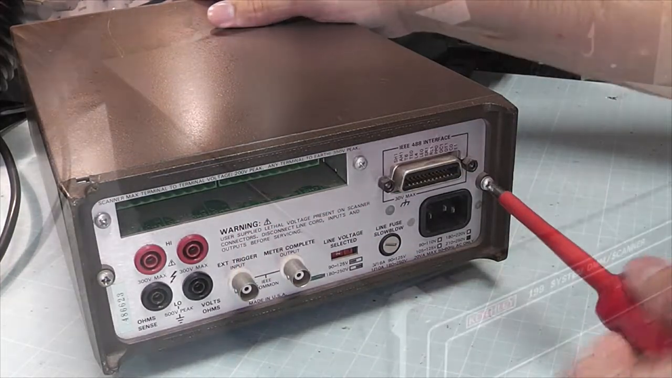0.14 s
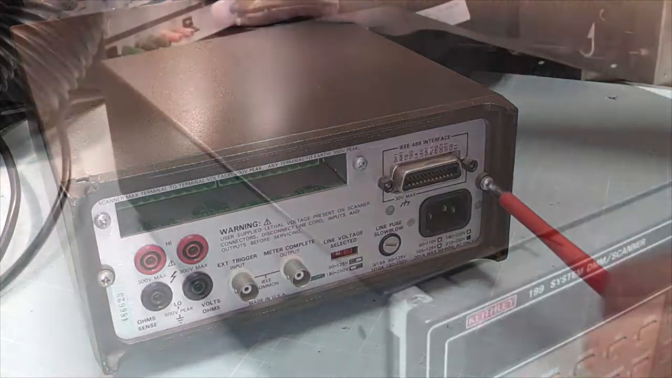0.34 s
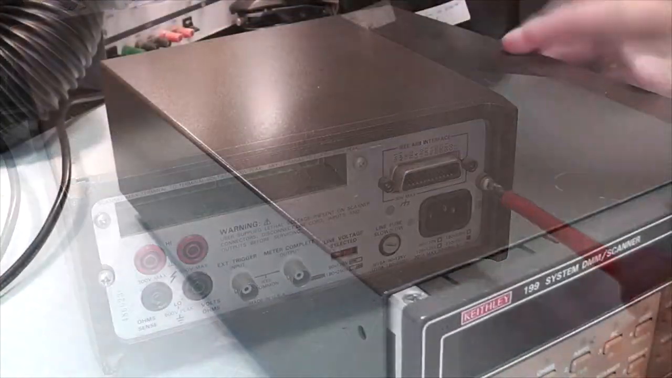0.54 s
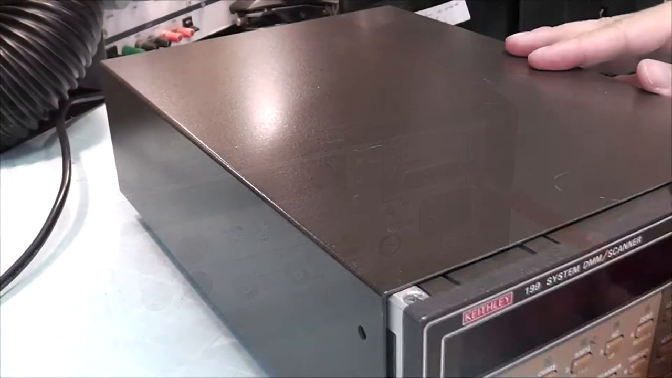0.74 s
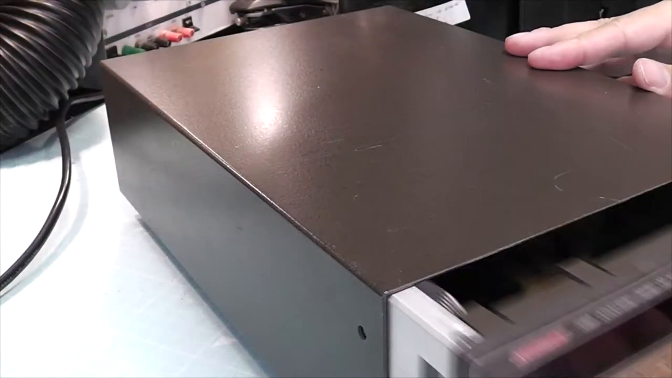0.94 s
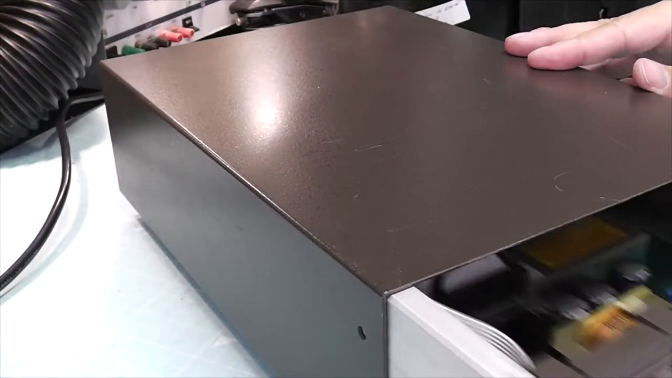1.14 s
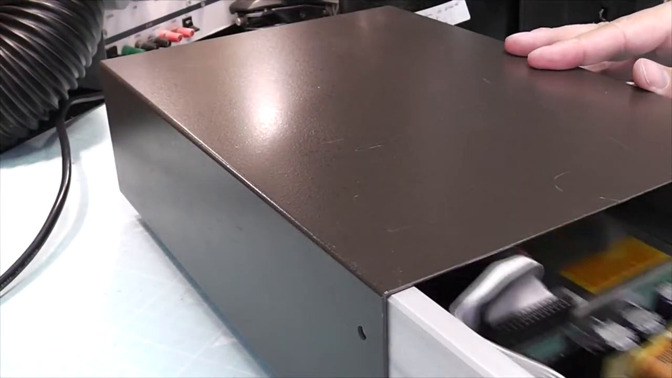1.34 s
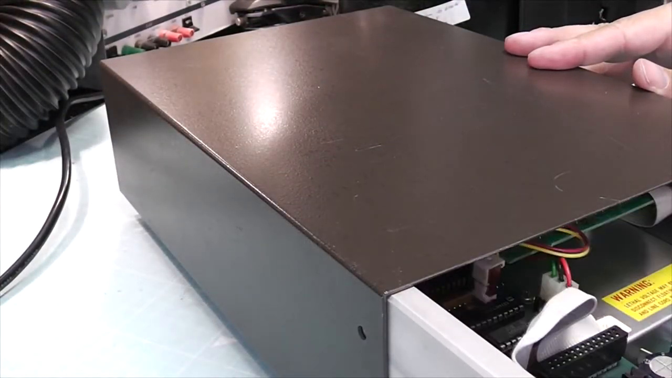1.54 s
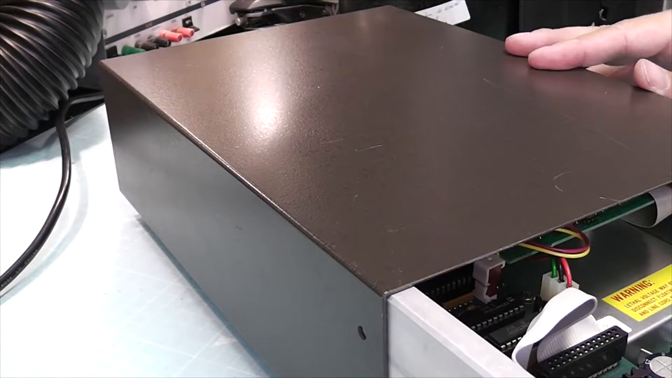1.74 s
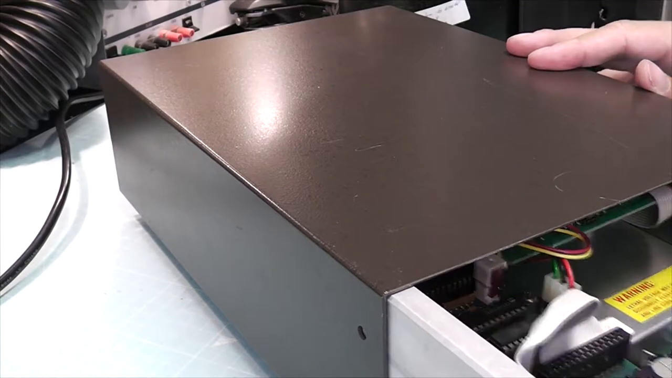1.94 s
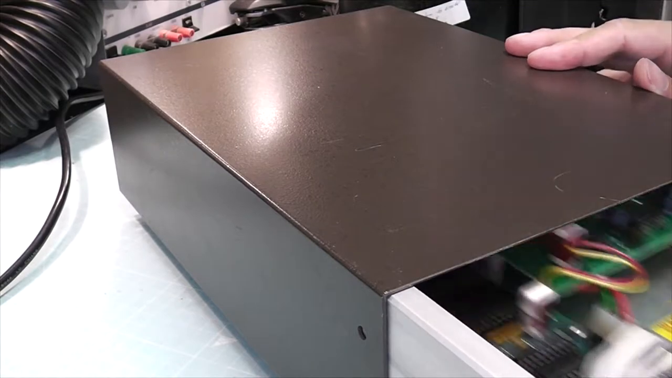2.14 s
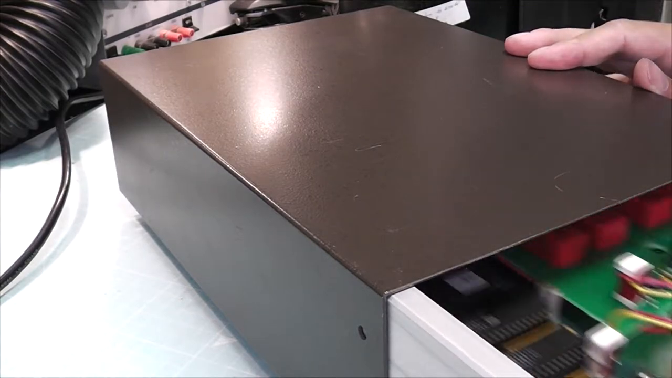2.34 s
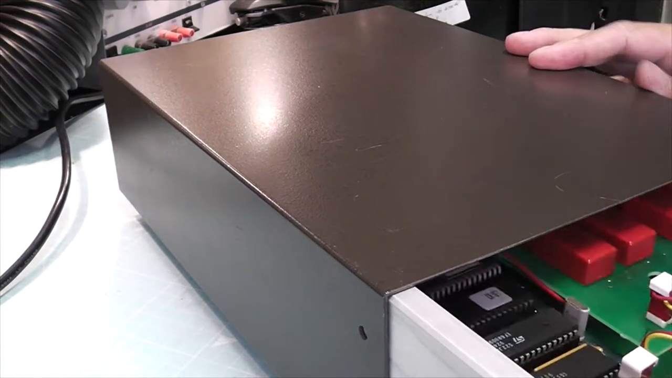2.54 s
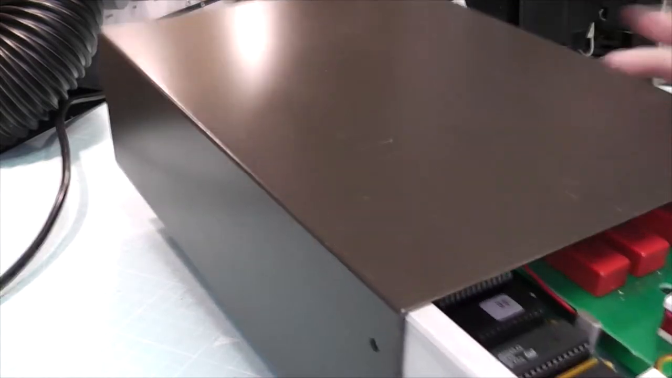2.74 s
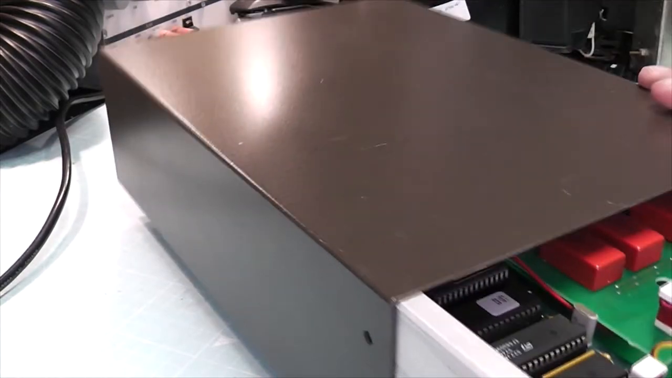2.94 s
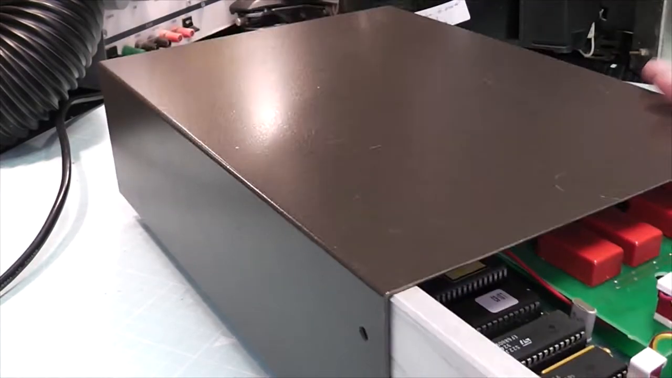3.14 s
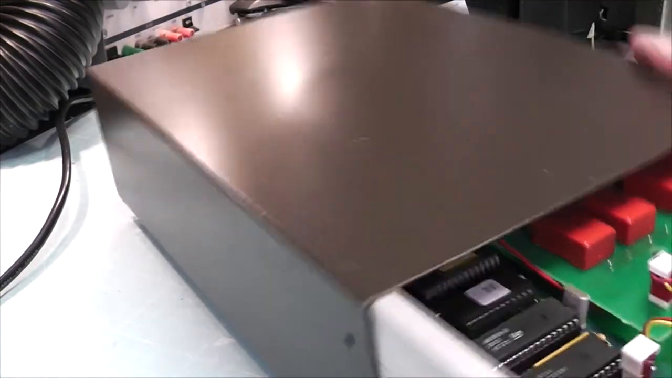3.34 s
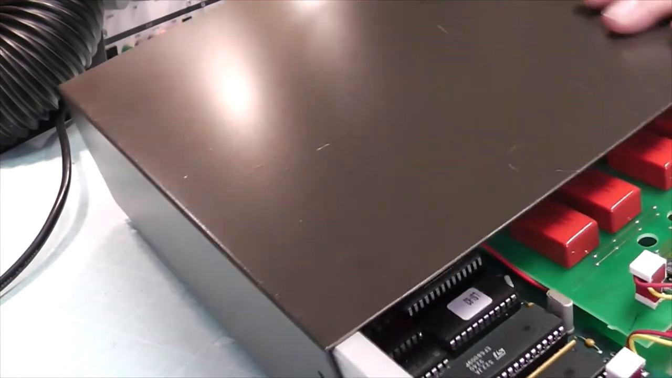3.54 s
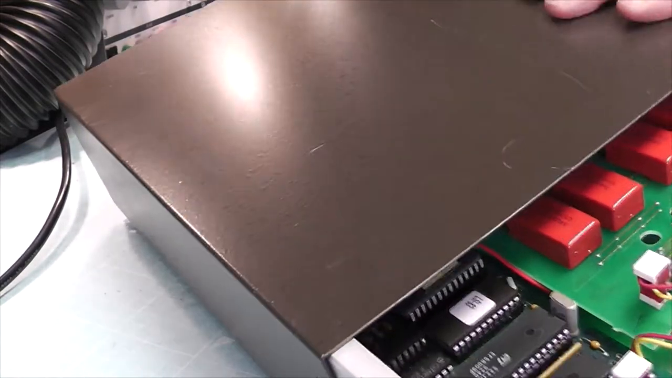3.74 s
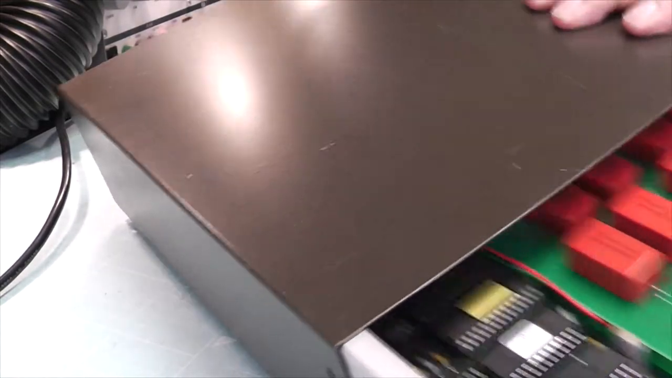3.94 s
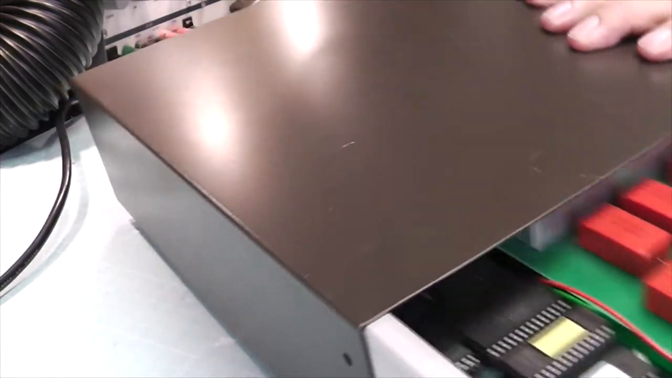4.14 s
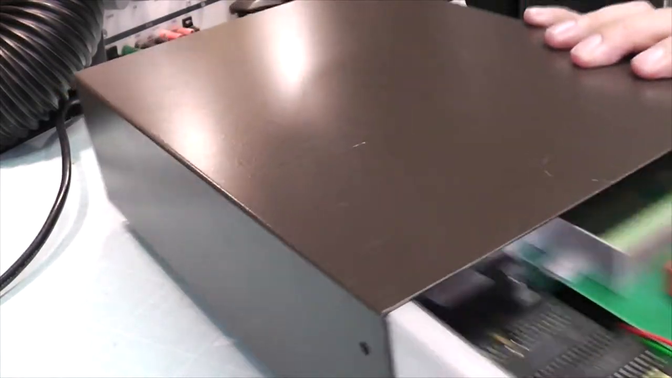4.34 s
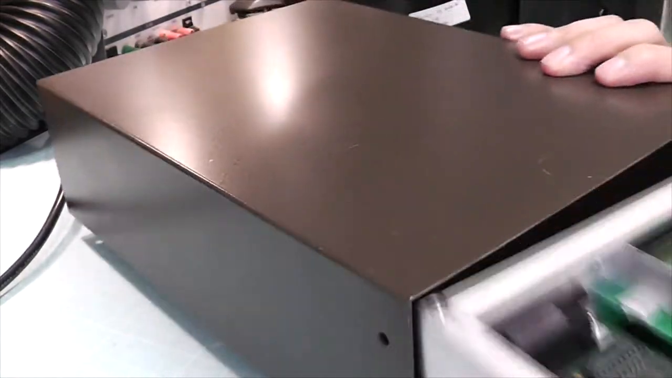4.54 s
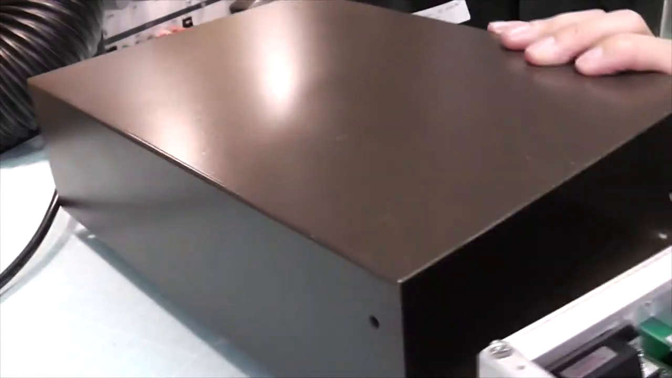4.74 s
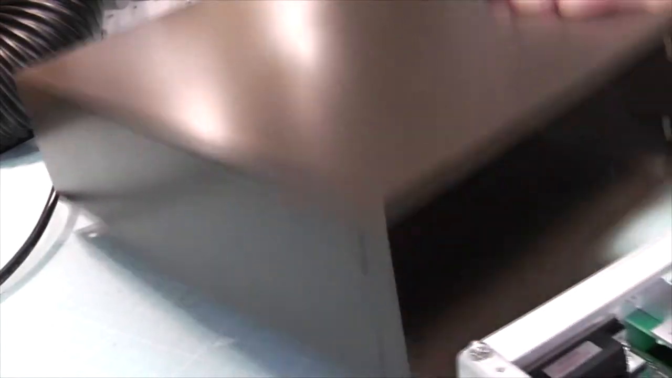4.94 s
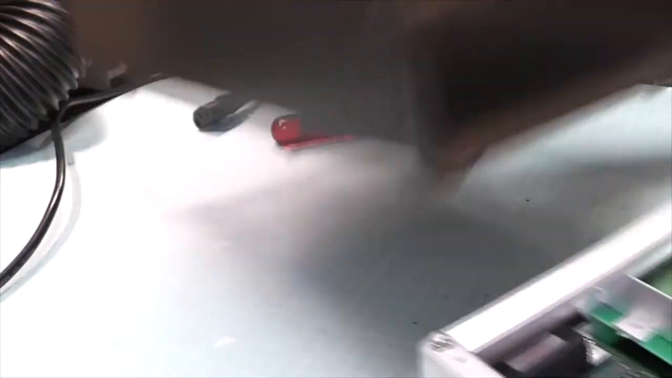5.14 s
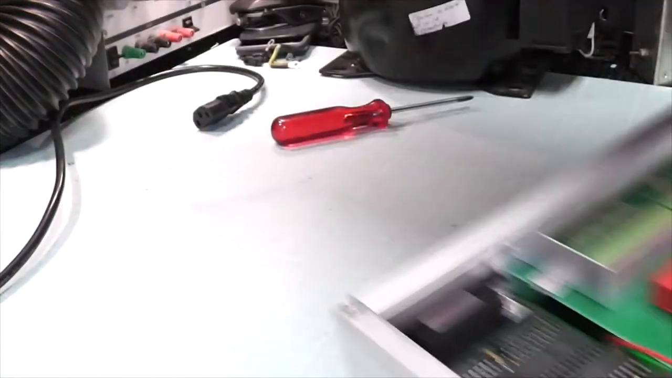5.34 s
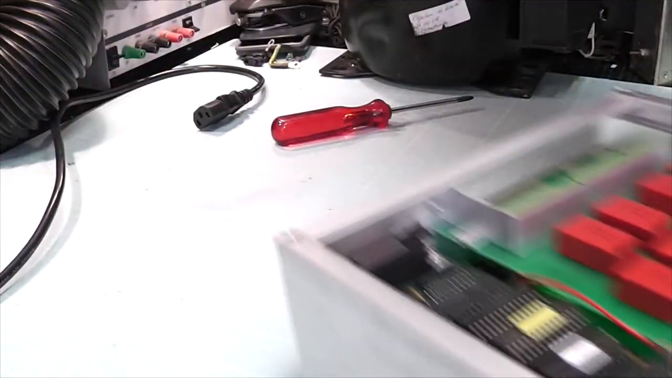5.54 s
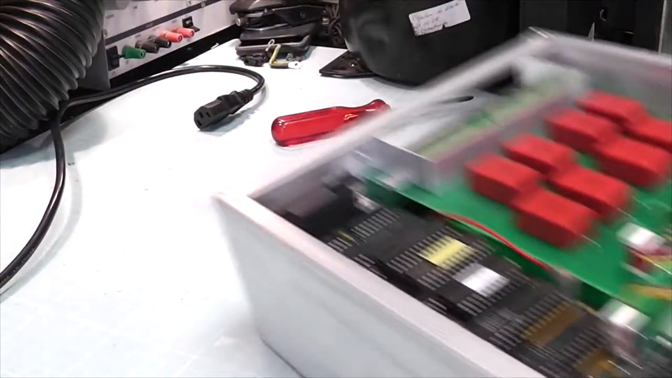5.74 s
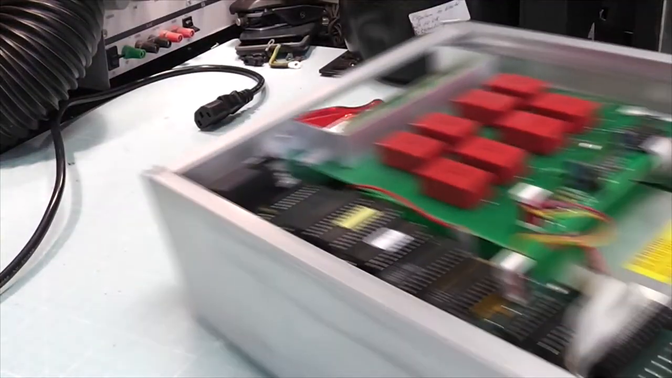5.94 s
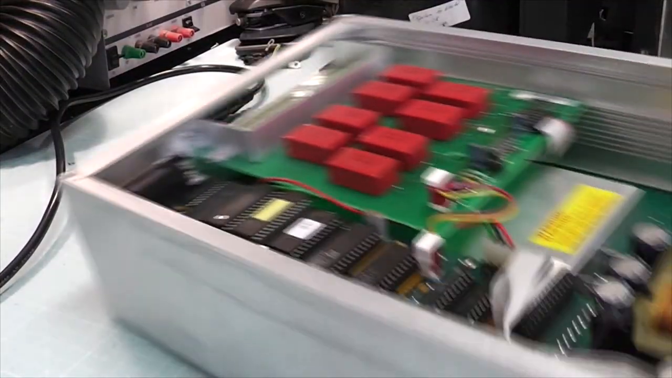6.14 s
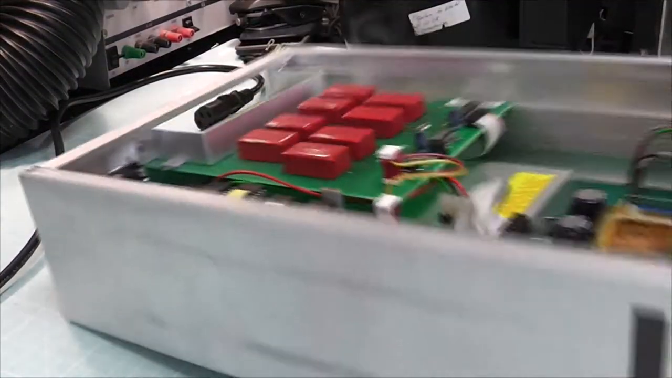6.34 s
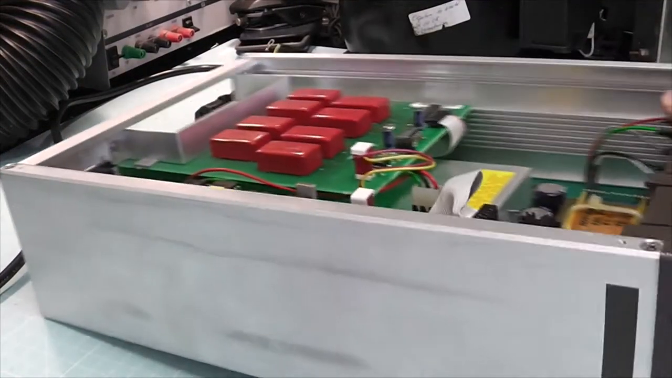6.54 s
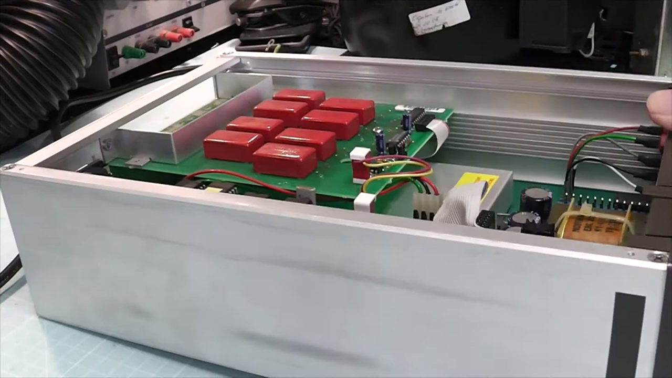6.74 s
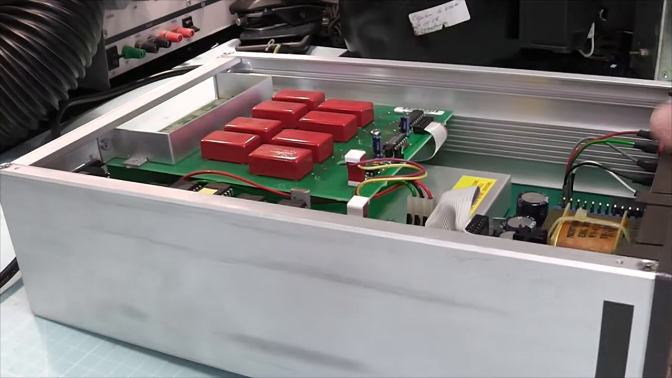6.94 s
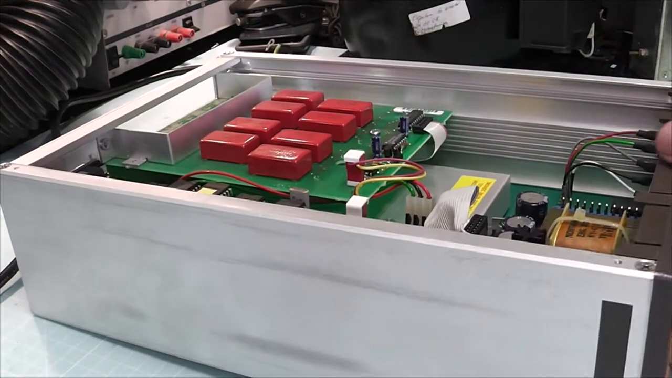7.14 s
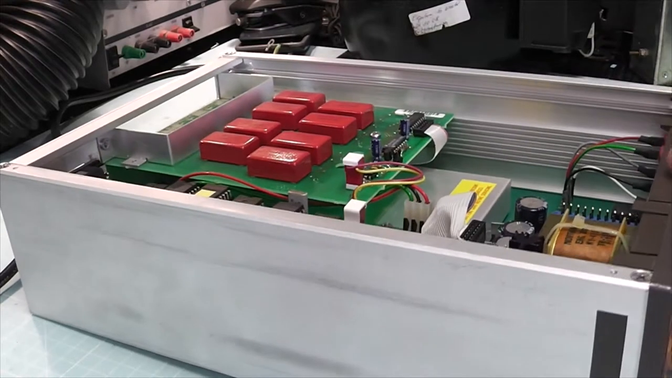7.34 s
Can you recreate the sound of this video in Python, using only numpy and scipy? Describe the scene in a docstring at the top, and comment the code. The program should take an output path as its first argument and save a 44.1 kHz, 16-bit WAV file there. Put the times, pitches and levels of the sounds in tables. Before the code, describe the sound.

After faint rubbing and light taps, a sheet-metal instrument case is worked off its chassis on a workbench. Metal scrapes on metal in uneven, hollow, hissy pulls, broken by sharp knocks, loud jerks and one brief squeak. The panels ring briefly as the case comes free. The chassis is then dragged softly and set down with a couple of clunks. The microphone is close, in a small quiet room.

```python
"""First come faint rubbing and light knocks: a sheet-metal case is being worked loose on a workbench.
Then it is pulled off its chassis (the inner frame) in jerks. Metal grinds on metal in tiny slips that
ring the panels, hiss and shake the bench. An edge squeaks; the chassis is dragged and dropped.
A small quiet room answers, and a nearby camera's limiter holds down the loudest jerks."""
import sys
import numpy as np
from scipy import signal
from scipy.fft import rfft, irfft
from scipy.io import wavfile
from scipy.ndimage import uniform_filter1d, minimum_filter1d

SR = 44100
rng = np.random.default_rng(int(sys.argv[2]) if len(sys.argv) > 2 else 0)


def master_out(mix):
    """Clip the mix to full scale and print it as 16-bit PCM to the path in sys.argv[1]."""
    frames = np.transpose(np.atleast_2d(mix))
    ceiling = np.clip(frames, -1, 1)
    pcm = np.round(ceiling * 32767).astype(np.int16)
    wavfile.write(sys.argv[1], SR, pcm)


N = 326340

# Hiss and thrum (the bench's low hum) offsets are added to the grinding level of the same row.
# faint rubbing of hands, screwdriver and chassis
# (time [s], grinding [dB], hiss offset [dB], thrum offset [dB])
HANDLING = [(0, -50.5, -2.5, -1.5), (0.301, -56.5, -2, 2.5), (0.42, -45, -5, 1), (0.789, -46, -24, 0.5),
            (1.68, -40.5, -20.5, -8), (1.88, -54, -20, -0.5), (2.56, -29.5, -21.5, -7.5),
            (2.72, -67.5, -11, 9), (3.251, -43.5, -39, -22), (3.8, -58, -6, -15), (4.88, -43, -20, -2),
            (5.08, -55.5, -16, 0), (5.2, -45.5, -9, -19), (5.4, -59, -8.5, 1.5), (5.6, -49.5, -14.5, -2.5),
            (6.2, -50, -18.5, -6), (6.3, -65.5, -6, 7), (6.75, -67.5, -12, 5), (7.4, -82, -17, -4)]
# edges knocking (time [s], grinding [dB], hiss offset [dB], time to fade 60 dB [s])
KNOCKS = [(0.055, -37, -8, 0.078), (0.242, -38, -8.5, 0.043), (0.405, -26.5, -13, 0.048),
          (0.464, -33, -24, 0.19), (0.577, -22.5, -16, 0.078), (0.646, -26, -42, 0.048),
          (0.711, -21, -27.5, 0.079), (0.74, -27.5, -62, 0.096), (0.855, -13.5, -15, 0.04),
          (0.867, -18, -30, 0.038), (0.893, -15, -44, 0.06), (1.001, -15.5, -41, 0.046),
          (1.612, -18.5, -18.5, 0.064), (1.826, -19.5, -24, 0.034), (1.921, -22.5, -46, 0.023),
          (1.967, -35, -27, 0.085), (2.519, -8, -22.5, 0.085), (2.533, -21.5, -36, 0.094),
          (3.199, -21.5, -24, 0.028), (3.918, -23, -28, 0.065), (4.02, -19.5, -23, 0.11),
          (4.667, -10, -9.5, 0.06), (6.203, -40.5, -33, 0.12), (6.439, -19.5, -10.5, 0.16),
          (6.457, -22, -19, 0.17), (6.607, -21.5, -25, 0.022), (6.769, -41, -40, 0.035),
          (6.912, -42, -18, 0.044), (7.118, -42.5, -45, 0.087)]
KNOCK_THRUM_OFFSET_DB = -22
# smooth pulls (time at full strength [s], hold [s], grinding [dB], hiss offset [dB], thrum offset [dB])
SLIDES = [(0.846, 0.23, -29, -14, -8), (1.02, 0.46, -28, -10, -23), (1.438, 0.099, -18.5, -21.5, -38.5),
          (2.026, 0.18, -26, -14, -37), (2.176, 0.088, -19, -15.5, -22.5), (2.28, 0.16, -25, -11.5, -41),
          (2.327, 0.027, -18, -34.5, -51), (2.56, 0.051, -36.5, -36, -20), (3.14, 0.093, -36, -28, -11),
          (3.362, 0.047, -26.5, -14, -37), (3.494, 0.0079, -22.5, -46, -16), (3.67, 0.094, -24, -19.5, -24),
          (3.84, 0.41, -38.5, -7, -20), (3.932, 0.047, -29.5, -14.5, -23), (4.04, 0.051, -31.5, -16, -17),
          (4.32, 0.09, -18.5, -17, -20.5), (4.48, 0.049, -32.5, -35.5, -38.5),
          (4.633, 0.055, -13, -18, -13.5), (4.749, 0.0042, -22.5, -16.5, -10),
          (4.838, 0.0038, -24.5, -15.5, -5), (7.295, 0.023, -46.5, -32, -11)]
SLIDE_RISE_DB_S, SLIDE_FALL_DB_S = 301, 271
# short bright scuffs of an edge (time [s], hiss [dB])
SCUFFS = [(1.204, -40.5), (2.622, -41), (2.737, -50), (2.804, -41), (3.157, -43), (3.501, -42),
          (4.039, -36.5), (4.398, -29), (4.441, -34.5)]
SCUFF_FADE_S = 0.14
# the metal grabs, drags and lets go
# (time [s], hold [s], grinding [dB], hiss offset [dB], thrum offset [dB], fall [dB/s])
JERKS = [(2.767, 0.065, -11.5, -17, -15, 256), (3.024, .016, -34.5, -36, -4, 402),
         (3.045, 0.032, -12, -18.5, -11, 334), (3.32, 0.0099, -24, -54, -42.5, 196),
         (3.635, 0.0066, -17.5, -41, -25.5, 310), (4.24, 0.11, -20, -20.5, -24.5, 170.5),
         (4.573, 0.014, -15.5, -15, -25, 204), (5.101, 0.0037, -35.5, -10, 6, 258),
         (6.42, 0.0046, -14, -16, -2.5, 354), (6.551, 0.0054, -18, -11.5, -3.5, 208)]
GRAB_S, JERK_HISS_FADE_DB_S = 0.0023, 126
# tone of the grinding (frequency [Hz], gain [dB])
GRIND_TONE = [(88, -23.5), (150, -31.5), (324, -19), (689, -1.5), (1100, -5.5), (1800, -11.5), (2370, -21),
              (4000, -35.5), (5200, -36.5), (8800, -120)]
# resonances of the case, damped by the hand (frequency [Hz], width [Hz], gain [dB])
SHELL = [(439, 36, 2), (579, 41.6, 9), (685.5, 27, 7.5), (838, 1.9, -16), (919, 5, 0), (1134, 164, -3.5),
         (1249.7, 46.2, 8.5), (1450, 700, -26), (1766, 41.4, 2), (2016, 92, -12.5)]
# notes of the freely ringing panels (frequency [Hz], gain [dB], time to fade 60 dB [s])
PANELS = [(188, -8, .85), (382, -19, .37), (684, -7, .15), (759, -1, .22), (829, -7, .23), (856, -14, 1.),
          (1260, -14, .2), (1330, -8, .24), (1480, -20, 1.5), (1717, -17, .51), (1938, -21, .71),
          (2180, -21, .55), (2692, -44, 1.5), (3090, -41, .47), (3935, -36, .6), (4436, -38, .45)]
# the contact spot lifts some resonances and mutes others
# (start [s], end [s], frequency [Hz], boost [dB])
CONTACT_BOOSTS = [(.85, .89, 250, 12), (.998, 1.03, 1300, 9), (.998, 1.04, 440, -15), (1.1, 1.56, 436, 10),
                  (.95, 2.7, 251, -8), (2., 2.46, 436, 10), (2.775, 2.89, 700, 12), (3.044, 3.12, 686, 9),
                  (3.49, 3.58, 581, 9), (4.24, 4.42, 33, 15.5), (4.24, 4.56, 684, 13), (4.24, 4.4, 1750, 9),
                  (4.24, 4.38, 1265, 5), (4.24, 4.42, 3000, 12), (4.6, 4.78, 575, 5), (0.75, 2.5, 5480, -9),
                  (6.605, 6.64, 1750, 15.5), (6.55, 6.72, 245, 7), (5.9, 6.7, 117, -10),
                  (.998, 1.03, 745, 8)]
# tone of the hiss (frequency [Hz], gain [dB])
HISS_TONE = [(1530, -18), (2600, -14), (3520, -9.5), (4460, -2.5), (5780, -3.5), (9540, 2.5), (12200, -1.5),
             (14200, -8.5), (16000, -10)]
# resonances of the bench top and chassis floor (frequency [Hz], width [Hz], gain [dB])
THRUM = [(33, 46, -20.5), (67.4, 8.7, -15.5), (119, 42, -5), (195.5, 21.3, -1), (256, 126, -6)]
# tone of the room's background noise (frequency [Hz], gain [dB])
AIR_TONE = [(15, -58), (25, -12), (451, -9.5), (607, -6), (734, -21), (1700, -18), (2480, -43.5),
            (4740, -29.5), (16000, -42.5)]
AIR_DB, ROOM_DB, ROOM_FADE_S = -61, -14, 0.032
# the hand lets the case ring (start [s], end [s], level [dB], freest frequency [Hz], spread [octaves])
LET_GO = [(2.53, 2.72, -27.5, 188, .3), (2.849, 3.035, -21, 2160, 2.96), (4.40, 4.603, -28.5, 188, .3),
          (4.72, 5.103, -18.5, 856, .05)]
# squeaks of an edge (start [s], end [s], first slip rate [Hz], last slip rate [Hz], level [dB])
SQUEAKS = [(3.322, 3.357, 589, 620, -26.5), (3.341, 3.407, 498, 486, -22.5),
           (3.395, 3.454, 648, 600, -32.5)]
# resonances rung by one hop of the chassis (frequency [Hz], width [Hz], gain [dB])
HOP = [(197, 20, 6), (573, 39, -20)]
LIMIT, TREBLE_CUT_HZ = .39, 15900


def undb(db):
    """Turn decibels into a gain to multiply by."""
    return np.exp(np.asarray(db) * np.log(10) / 20)


def level(x, db):
    """Set the average (rms) level of a signal."""
    return x * undb(db) / np.sqrt(np.mean(x ** 2))


def walk(rate):
    """Random values drawn rate times a second and joined by lines."""
    return np.interp(np.arange(N) * rate / SR, np.arange(1000), rng.standard_normal(1000))


def cut(x, hz, keep="low"):
    """Keep the low or the high side of hz, with a gentle slope."""
    return signal.sosfilt(signal.butter(2, hz, keep, fs=SR, output="sos"), x)


def colour(x, tone):
    """Filter a signal to follow a tone table."""
    hz, db = np.transpose(tone)
    grid_hz = np.maximum(np.fft.rfftfreq(4096, 1 / SR), 1)
    cepstrum = irfft(np.interp(np.log(grid_hz), np.log(hz), db) * np.log(10) / 20)
    cepstrum[1:2048] *= 2  # folded so that nothing rings before its cause
    cepstrum[2049:] = 0
    return signal.oaconvolve(x, irfft(np.exp(rfft(cepstrum))))[:N]


def mode(x, hz, width):
    """One resonance, with gain 1 at its centre."""
    r = np.exp(-np.pi * width / SR)
    return signal.lfilter([1 - r, 0, r - 1], [1, -2 * r * np.cos(2 * np.pi * hz / SR), r * r], x)


def contact_boost(hz):
    """Boost in dB over time for a resonance at hz; each reaches a tenth of an octave either way."""
    db = np.zeros(N)
    for start, end, centre, boost_db in CONTACT_BOOSTS:
        db[int(start * SR):int(end * SR)] += boost_db * np.exp(-(10 * np.log2(hz / centre)) ** 2)
    return db


def resonate(push, table, wander_db, rate):
    """The contact spot travels, so each resonance is driven now more, now less."""
    out = np.zeros(N)
    for k, (hz, width, db) in enumerate(table):
        reach = undb(wander_db * walk(rate) + contact_boost(hz))
        out += (-1) ** k * undb(db) * mode(push * reach, hz, width)
    return out


def drive(body, push, force):
    """Send push times force through the filter body; a steady force of 1 gives an rms near 1."""
    steady = body(push)
    return body(push * force) / np.std(steady)


def grit(rate, scatter_db):
    """Tiny slips: about rate random clicks a second; scatter_db makes their sizes uneven."""
    chance, size, sign = rng.random((3, N))
    clicks = (chance < rate / SR) * np.sign(sign - .5) * undb(-scatter_db * np.log(size + 1e-4))
    return level(clicks, 0)


def blow(start, fade_s):
    """The samples a blow covers and its power: a quick rise, then 60 dB down in fade_s."""
    first = int(start * SR)
    age = np.arange(min(N - first, SR // 4)) / SR
    power = np.exp(-2 * np.log(1000) * age / fade_s) * np.minimum(1, age / 0.0013)
    return slice(first, first + len(age)), power


def effort():
    """Strength of grinding, hiss and thrum over time: all the movements add their power."""
    t = np.arange(N) / SR
    times, db, hiss_db, thrum_db = np.transpose(HANDLING)
    power = np.array([undb(2 * np.interp(t, times, db + offset)) for offset in (0, hiss_db, thrum_db)])
    for start, db, hiss_db, fade_s in KNOCKS:
        span, shape = blow(start, fade_s)
        power[:, span] += undb(2 * (db + np.vstack([0, hiss_db, KNOCK_THRUM_OFFSET_DB]))) * shape
    for start, hold, db, hiss_db, thrum_db in SLIDES:
        span = slice(int(max(start - .3, 0) * SR), int((start + hold + .3) * SR))
        rise_db = SLIDE_RISE_DB_S * np.maximum(start - t[span], 0)
        fall_db = SLIDE_FALL_DB_S * np.maximum(t[span] - start - hold, 0)
        power[:, span] += undb(2 * (db - rise_db - fall_db + np.vstack([0, hiss_db, thrum_db])))
    for start, db in SCUFFS:
        span, shape = blow(start, SCUFF_FADE_S)
        power[1, span] += undb(2 * db) * shape  # hiss only
    age = t[:int(.4 * SR)]
    for start, hold, db, hiss_db, thrum_db, fall_db_s in JERKS:
        grind_db = db - fall_db_s * np.maximum(age - hold, 0)
        hiss_fade_db = JERK_HISS_FADE_DB_S * np.maximum(age - hold / 2, 0)
        layers_db = np.array([grind_db, grind_db + hiss_db - hiss_fade_db, grind_db + thrum_db])
        power[:, int(start * SR):][:, :len(age)] += undb(2 * layers_db) * np.minimum(1, age / GRAB_S)
    return np.sqrt(power)


def grind(force):
    """Slips shake the hand-damped case and its many small resonances."""
    slips = grit(2500, scatter_db=0) * undb(2.8 * walk(45))  # the rub catches and lets go
    knock_s, knock_db = np.transpose(KNOCKS)[:2]
    # each knock opens with one big click, harder when loud
    slips[(knock_s * SR).astype(int) + SR // 800] = undb(24.5 + 0.49 * knock_db)
    held = [(hz, 24, db / 2) for hz, db, _ in PANELS if 300 < hz < 1800]  # the grip silences the rest
    dense = drive(lambda x: colour(x, GRIND_TONE), slips, force)
    shell = drive(lambda x: resonate(x, SHELL, wander_db=2.2, rate=8), slips, force)
    panels = drive(lambda x: resonate(x, held, wander_db=-0.5, rate=2), slips, force)
    return undb(-7) * dense + undb(-2.5) * shell + undb(-9) * panels


def hiss(force, grind_force):
    """Fine roughness wakes many high resonances; heavy grinding sounds coarser, light sliding finer."""
    flutter = force * undb(1.92 * walk(60))
    high_hz = np.geomspace(2700, 14500, 44) * undb(.1 * rng.standard_normal(44))
    high_modes = [(hz, 110, 0) for hz in high_hz]
    smooth, side = (drive(lambda x: colour(x, HISS_TONE), grit(9000, scatter_db=2.5), flutter)
                    for _ in range(2))
    ringing = drive(lambda x: colour(resonate(x, high_modes, wander_db=4, rate=9), HISS_TONE),
                    grit(9000, scatter_db=2.5), flutter)
    mid = undb(-3.5) * smooth + undb(-2) * ringing
    coarseness = np.clip((grind_force / undb(-45.5)) ** 0.19, .4, 2.5) * undb(contact_boost(5500))
    return mid + (coarseness - 1) * cut(mid, 6000), undb(-2.5) * cut(side, 11000, "high")


def bench_thrum(force):
    """Weight shifting on the feet shakes the bench; the lowest shudder differs left and right."""
    mid, side = (drive(lambda x: resonate(x, THRUM, wander_db=3, rate=5.8),
                       grit(900, scatter_db=1.7) * undb(2.86 * walk(18)), force) for _ in range(2))
    return cut(mid, 500), undb(-12) * cut(side, 160)


def room_echo(x):
    """The room returns a fading cloud of echoes, different at each microphone."""
    age = np.arange(SR // 2) / SR
    cloud = rng.standard_normal((2, len(age))) * np.exp(-np.log(1000) * age / ROOM_FADE_S) * (age > .004)
    cloud /= np.sqrt(np.sum(cloud ** 2, axis=1, keepdims=True))
    return undb(ROOM_DB) * signal.oaconvolve(x[None], cloud)[:, :N]


def room_air():
    """Quiet, nearly steady background noise, mostly alike left and right."""
    mid, side = (colour(rng.standard_normal(N), AIR_TONE) for _ in range(2))
    return level(mid + 0.51 * np.array([side, -side]), AIR_DB) * undb(walk(1.93))


def panel_ring():
    """Free panels sing on after a jerk until the hand closes on them again."""
    out = np.zeros(N)
    hz, db, fade_s = np.transpose(PANELS)[:, :, None]
    for start, end, ring_db, free_hz, spread in LET_GO:
        age = np.arange(int((end - start) * SR)) / SR
        gain = undb(ring_db + db - 10 * (np.log2(hz / free_hz) / spread) ** 2)
        decay = np.exp(-np.log(1000) * age / fade_s)
        tones = gain * decay * np.sin(2 * np.pi * (hz * age + rng.random(hz.shape)))
        hand_open = np.minimum(1, np.minimum(age / 0.008, (age[-1] - age) / 0.0022))
        out[int(start * SR):][:len(age)] += tones.sum(axis=0) * hand_open
    return out


def squeak():
    """An edge sticks and slips at a nearly even rate: a wavering note, coloured by the case."""
    out = np.zeros(N)
    harmonic = np.arange(1, 5)[:, None]
    for start, end, from_hz, to_hz, db in SQUEAKS:
        count = int((end - start) * SR)
        hz = np.linspace(from_hz, to_hz, count) * (1 + 0.028 * walk(215)[:count])
        phase = 2 * np.pi * np.cumsum(hz) / SR
        gain = np.sqrt(harmonic) * (harmonic * from_hz < 2100)  # only harmonics below about 2100 Hz
        tones = gain * np.sin(harmonic * phase + harmonic ** 2)
        note = colour(tones.sum(axis=0), GRIND_TONE)[:count]
        swell = np.sqrt(np.hanning(count)) * undb(2.4 * walk(99)[:count])
        out[int(start * SR):][:count] += level(note, db) * swell
    return out


def judder(start=5.493, end=6.2, hops_per_s=22.5, db=-52.5):
    """The dragged chassis hops on its feet: nearly even soft bumps, each of its own size."""
    times = np.arange(start, end, 1 / hops_per_s)
    late, size = rng.standard_normal((100, 2))[:len(times)].T
    hops = np.zeros(N)
    hops[((times + .004 * late) * SR).astype(int)] = undb(3 * size)
    bumps = sum(undb(hop_db) * mode(mode(hops, hz, width), hz, hz) * hz / width
                for hz, width, hop_db in HOP)
    return bumps * undb(db) / np.std(bumps[int(start * SR):int(end * SR)])


def scene():
    """Mix in stereo: mid goes to both ears, side is added on the left and taken away on the right."""
    grind_force, hiss_force, thrum_force = effort()
    hiss_mid, hiss_side = hiss(hiss_force, grind_force)
    thrum_mid, thrum_side = bench_thrum(thrum_force)
    mid = grind(grind_force) + panel_ring() + squeak() + judder() + thrum_mid + hiss_mid
    side = hiss_side + thrum_side
    stereo = np.array([mid + side, mid - side]) + room_echo(mid) + room_air()
    return stereo * undb([[-.55], [.55]])  # a little louder on the right


def record(dry):
    """A limiter turns the sound down around peaks above LIMIT; then the highest treble is cut."""
    peak = -minimum_filter1d(-np.abs(dry).max(axis=0), size=100)
    gain = uniform_filter1d(np.minimum(1, LIMIT / (peak + 1e-9)), size=50)
    return signal.sosfilt(signal.ellip(10, .2, 80, TREBLE_CUT_HZ, fs=SR, output="sos"), dry * gain)


dry = scene()
out = record(dry)
master_out(out)
```